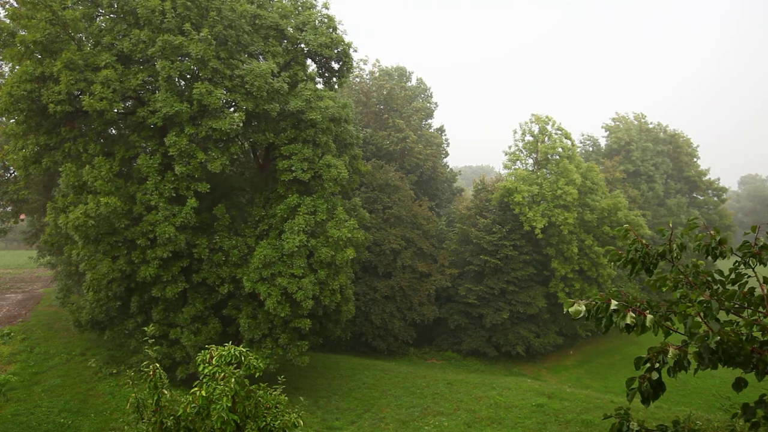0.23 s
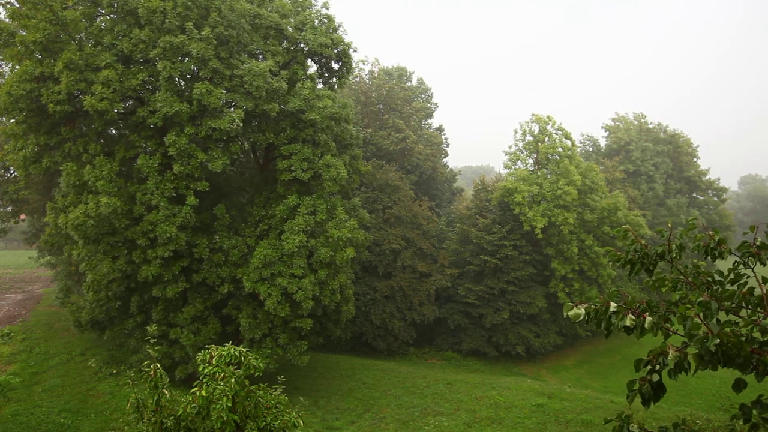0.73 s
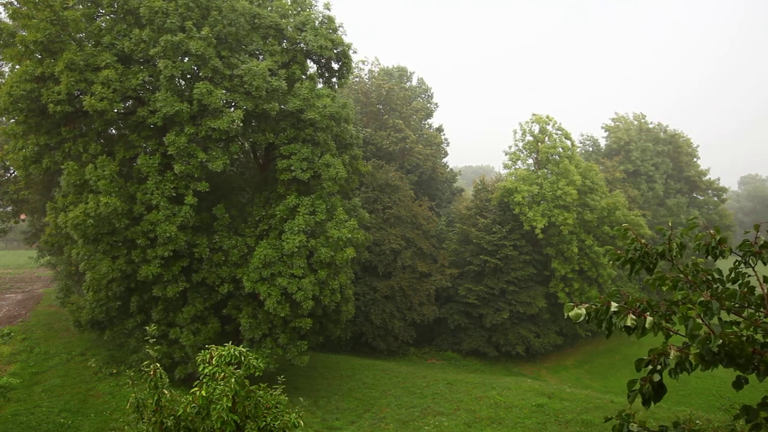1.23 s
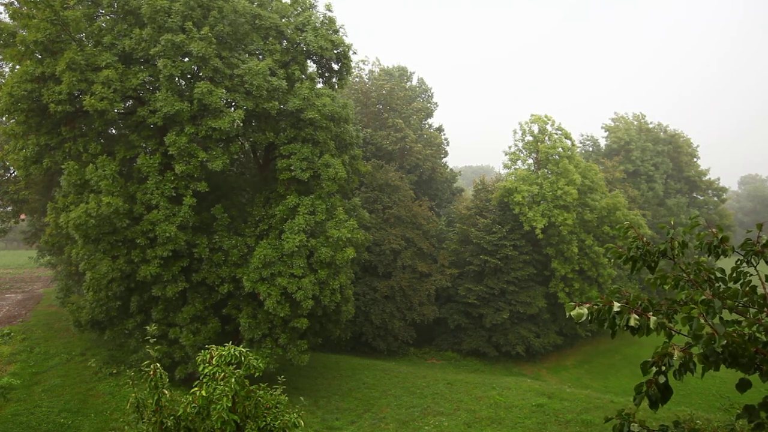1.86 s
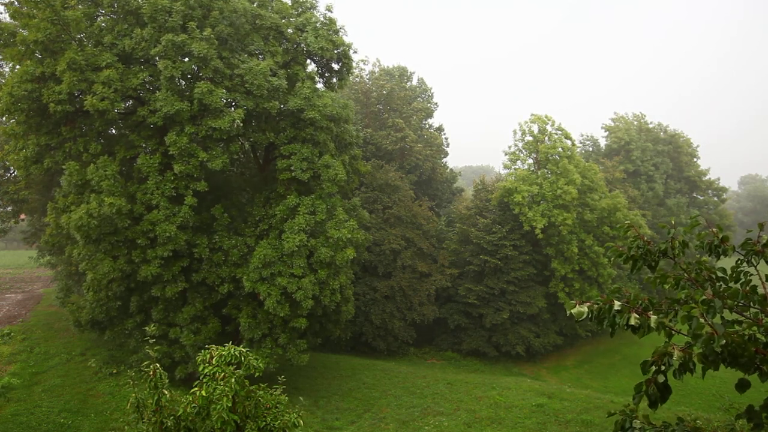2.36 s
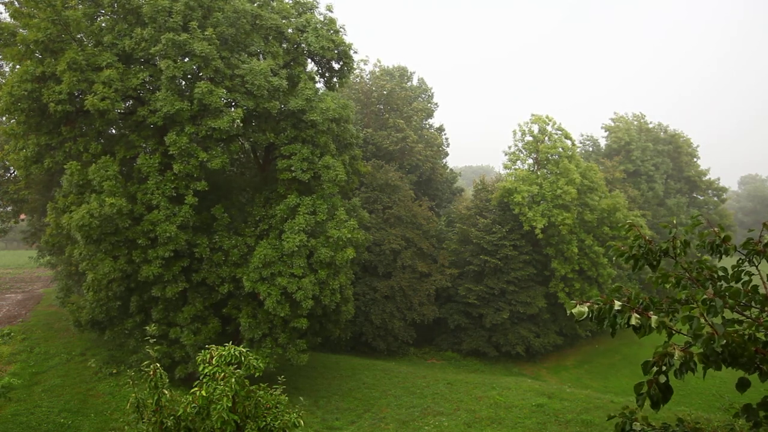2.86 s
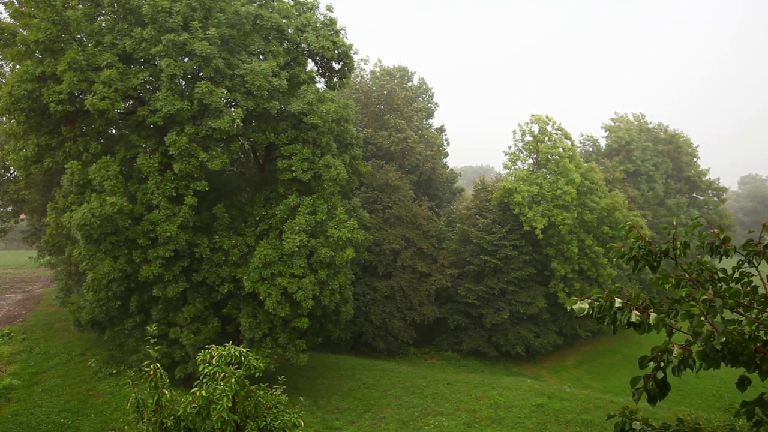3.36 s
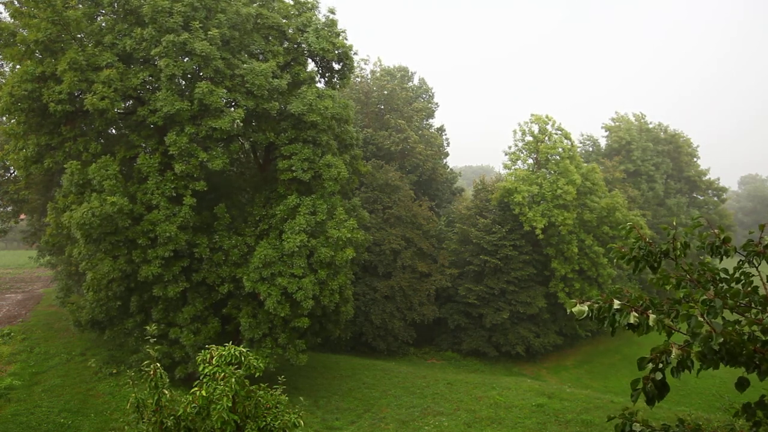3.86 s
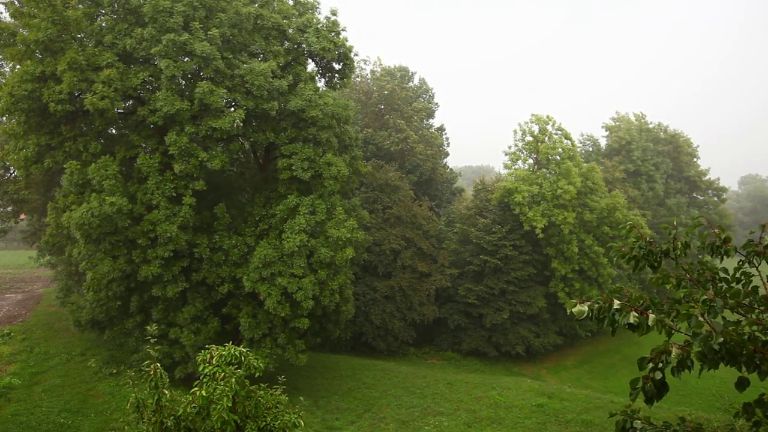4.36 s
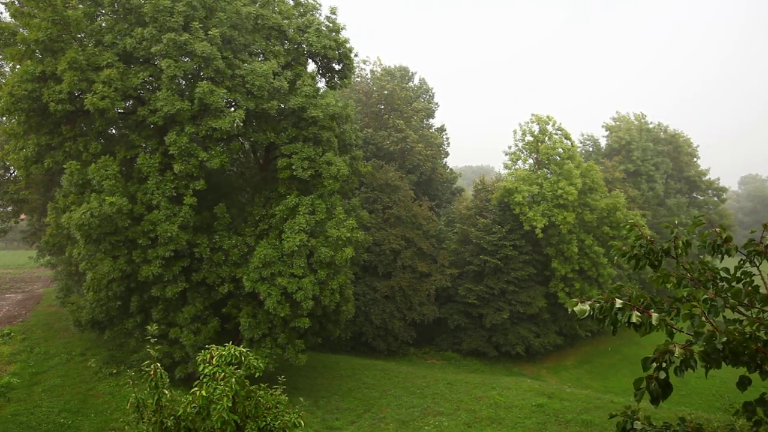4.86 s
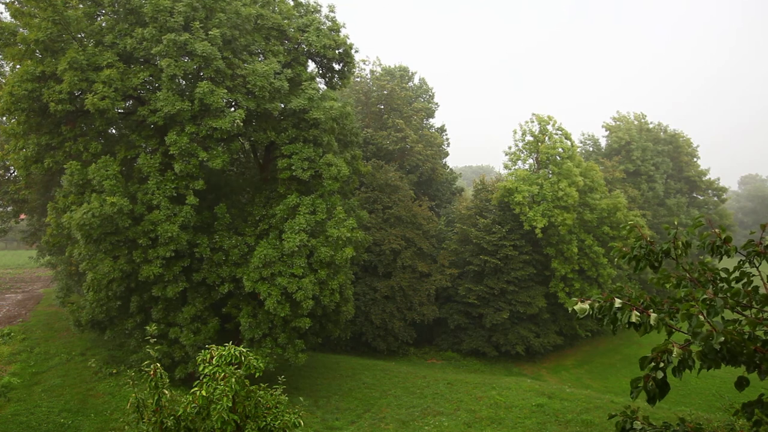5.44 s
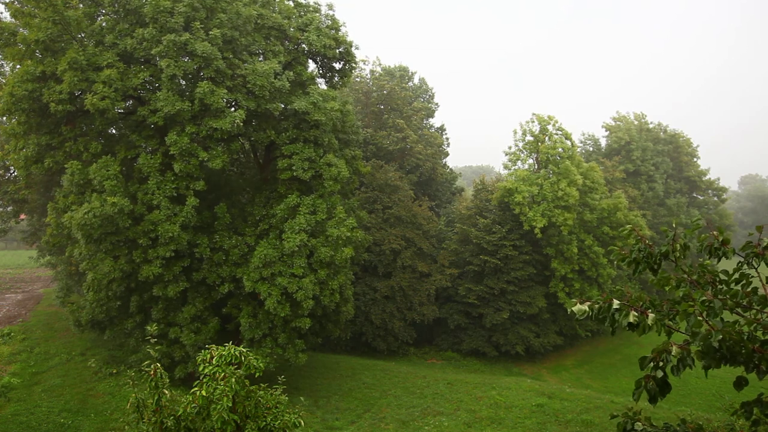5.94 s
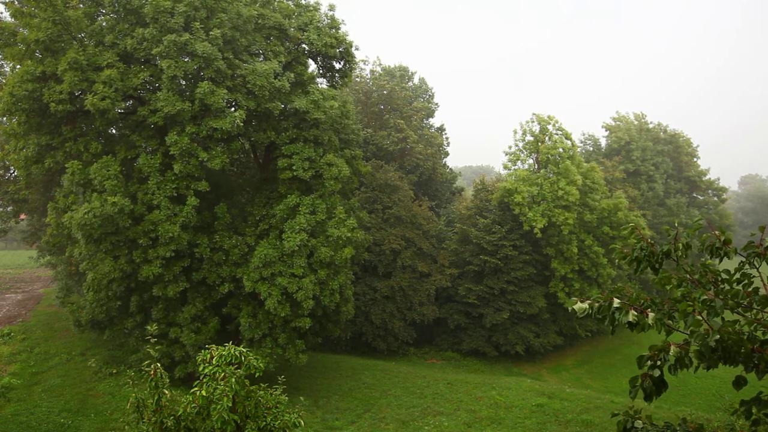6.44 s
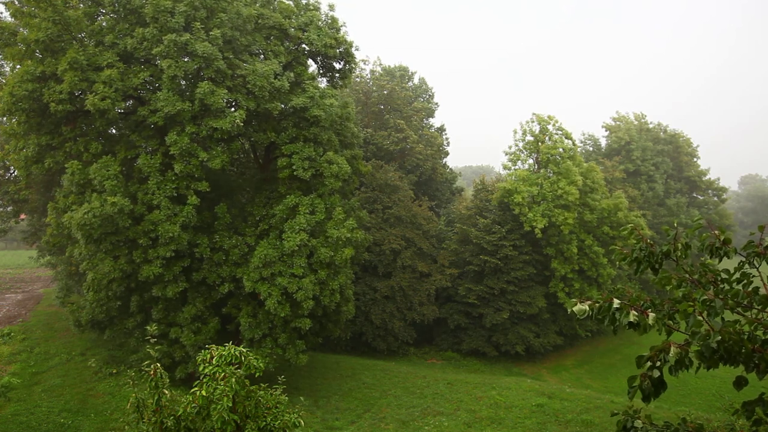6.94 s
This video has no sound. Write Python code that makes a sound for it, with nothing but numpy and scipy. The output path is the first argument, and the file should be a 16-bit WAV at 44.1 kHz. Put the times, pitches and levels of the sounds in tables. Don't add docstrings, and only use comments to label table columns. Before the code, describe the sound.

Heavy steady rain hisses over leafy trees and grass, with close drops snapping and splashing on leaves and soft wind thumps on the microphone.

```python
import sys
import numpy as np
from scipy import signal
from scipy.fft import rfft, irfft
from scipy.io import wavfile
from scipy.ndimage import uniform_filter1d

SR = 44100
rng = np.random.default_rng(int(sys.argv[2]) if len(sys.argv) > 2 else 0)


def field_ratio(decibels):
    return 10 ** (np.asarray(decibels, dtype=float) / 20)


def transcribe(u):
    v = np.clip(np.atleast_2d(u).T, -1, 1)
    q = np.round(v * 32767).astype(np.int16)
    wavfile.write(sys.argv[1], SR, q)


N = 317520


def evened(x):
    return x / np.sqrt(np.mean(x ** 2) + 1e-20)


def read(points, hz):
    f, value = np.transpose(points)
    return np.interp(np.log(hz + 1), np.log(f + 1), value)


def follow(rows):
    return np.interp(np.arange(N) / SR, *np.transpose(rows))


def colour(x, points):
    return irfft(rfft(x) * field_ratio(read(points, np.fft.rfftfreq(len(x), 1 / SR))), len(x))


def add(mix, s, sound):
    part = mix[..., round(s * SR):][..., :sound.shape[-1]]
    part += sound[..., :part.shape[-1]]


def ring(x, hz, width_hz):
    turn = np.exp(2j * np.pi * hz * np.arange(len(x)) / SR)
    r = np.exp(-np.pi * width_hz / SR)
    return 2 * (turn * signal.lfilter([1 - r], [1, -r], x / turn)).real


def twice(x, hz, width_hz):
    return evened(ring(ring(x, hz, width_hz), hz, width_hz))


def decay(count, t60):
    return field_ratio(-60 * np.arange(count) / SR / t60)


def peaked(x, db):
    return field_ratio(db) * x / abs(x).max()


# (t/s, level/dB)
SHELTER_ECHOES = [
    (.004, -10.5),
    (.0078, -11),
    (0.0151, -11),
    (.023, -18.5),
]


def echoed(x):
    out = x.copy()
    for s, db in SHELTER_ECHOES:
        add(out, s, field_ratio(db) * x)
    return out


def far_rain(patchy_db=0.55, flicker_db=0.35):
    frames, hz = N // 128 + 5, np.fft.rfftfreq(512, 1 / SR)
    a, b, patches = rng.standard_normal((frames, 257, 3)).T
    a, b, patches = a.T, b.T, patches.T
    a, b, patches = a.T, b.T, patches.T
    patches = uniform_filter1d(patches, size=10, axis=0)
    patches = evened(uniform_filter1d(patches, size=20, axis=1))
    flicker = evened(uniform_filter1d(rng.standard_normal(frames), size=16))
    treble = np.clip(hz / 4000, 0, 1)[:, None]
    z = (a + 1j * b) * field_ratio(treble * (patchy_db * patches + flicker_db * flicker))
    return evened(signal.istft(z, nperseg=512, noverlap=384)[1][:N])


def patter(per_s=200, spread_db=4.5, t60=0.034, low_hz=1100, high_hz=13000, count=30):
    falls = np.minimum(rng.exponential(1, N), 3)
    size = field_ratio(spread_db * falls) * (rng.random(N) < per_s / SR)
    leaf, out = rng.integers(0, count, N), np.zeros(N)
    for k, hz in enumerate(np.linspace(low_hz, high_hz, count)):
        burst = rng.standard_normal(2048) * decay(2048, t60)
        out += signal.oaconvolve(size * (leaf == k), evened(ring(burst, hz, 0.21 * hz)))[:N]
    return evened(out)


# (t/s, level/dB)
DOWNPOUR = [(0, -19.5), (.9, -18.5), (1.2, -18), (2.0, -20.5), (2.7, -20), (3.2, -21.5), (3.6, -19.5),
            (4.1, -20), (4.8, -18.5), (5.2, -20), (5.43, -18), (5.6, -20.5), (6.0, -19.5), (6.8, -20.5),
            (7.2, -20)]
# (f/Hz, level/dB per Hz)
RAIN_COLOUR = [(15, -47), (25, -27), (38, -9.5), (156, -5.5), (282, -2.5), (423, -5.5), (560, -5),
               (687, -2.5), (975, -1.5), (1910, -0.5), (3200, -2.5), (5460, -2), (9000, -4.5),
               (16000, -2.5)]


def downpour():
    rain = far_rain() + field_ratio(-15.0) * evened(echoed(patter()))
    return evened(colour(rain, RAIN_COLOUR)) * field_ratio(follow(DOWNPOUR) + 5.0)


def close_drop(db, leaf_hz, spray_hz, spray_db, t60, splash=0.52, blow=.15):
    count = 5000
    noise = rng.standard_normal((3, count))
    noise *= 1 + blow * np.exp(-np.arange(count) / SR / 0.00045)
    spray = field_ratio(spray_db)
    leaf = np.sqrt(1 - spray ** 2) * twice(noise[0], leaf_hz, 700)
    rings = leaf + spray * twice(noise[1], spray_hz, 1370)
    wide = twice(noise[2], 7500, 7700)
    return peaked(rings * decay(count, t60) + splash * wide * decay(count, 3.1 * t60), db - 3.0)


# (t/s, peak level/dB, leaf ring f/Hz, spray ring f/Hz)
KNOCKS = [(0.416, -4.5, 3720, 5920), (0.9276, 3.5, 3070, 4650), (2.8397, -4.5, 2090, 6400),
          (2.8804, -8.5, 2230, 4420), (3.4072, -9, 1920, 5750), (3.5557, -3, 3800, 4200),
          (4.6934, -6, 2560, 5500), (4.9371, -6, 2600, 4510), (5.021, -6, 3750, 5490),
          (5.291, -3, 1860, 5590), (5.3611, -5, 2630, 7350), (5.4405, -1, 2030, 5100),
          (5.9963, -7, 1830, 4330), (6.0543, -1, 2520, 4820), (6.8468, -3, 3450, 4630)]


def leaf_knocks(close, spray_db=-4.5, t60=0.023, strays=18):
    for s, db, leaf_hz, spray_hz in KNOCKS:
        add(close, s, close_drop(db, leaf_hz, spray_hz, spray_db, t60))
    for when, size, leaf, spray in rng.random((strays, 4)):
        db = -15 + 6 * (size - .5)
        leaf_hz = np.interp(leaf, (0, 1), (1600, 3800))
        spray_hz = np.interp(spray, (0, 1), (4300, 7200))
        add(close, when * N / SR, close_drop(db, leaf_hz, spray_hz, spray_db, t60))


# (t/s, peak level/dB, spray ring f/Hz)
BURSTS = [(0.7598, -2.5, 5570), (1.3096, -4, 5480), (1.5788, -6, 6490), (1.767, -0.5, 5140),
          (2.1056, -6, 4630), (2.815, -3, 8000), (2.9734, -1.5, 4930), (3.321, -5.5, 5500),
          (3.5957, -5, 5980), (4.5295, -6, 4340), (5.1028, -4.5, 4510), (5.234, -4.5, 7290),
          (5.9347, -7, 6910), (6.0864, -3.5, 5130), (6.123, -2.5, 5370), (6.352, -3, 4500),
          (6.403, -6, 5020), (6.7048, -6, 7860), (6.769, -6.5, 6020)]


def spray_bursts(close, leaf_hz=3360, spray_db=-.6, t60=0.034):
    for s, db, spray_hz in BURSTS:
        add(close, s, close_drop(db, leaf_hz, spray_hz, spray_db, t60))


# (t/s, peak level/dB, f/Hz, width [share of f])
PLINKS = [(0.9274, -8.5, 3100, .08), (5.362, -11, 2600, .1), (5.362, -12, 3250, .1),
          (.9275, -5.5, 4600, 0.079), (.928, -9, 7800, .12), (1.268, -11, 5500, .2),
          (1.772, -12, 5200, 0.14), (2.828, -15, 7200, .2), (2.841, -8, 4500, 1.3),
          (3.036, -5.5, 14500, .4), (3.324, -7, 6560, 0.69), (3.549, -12, 3320, .3), (3.557, -8, 4200, 1),
          (3.597, -9, 8000, .5), (4.301, -10.5, 2540, 0.21), (4.696, -9, 8500, 1.1),
          (4.698, -9, 2950, 0.26), (5.04, -14, 2520, .16), (5.036, -5, 7500, 0.7), (5.362, -15, 6500, 1.1),
          (5.443, -8.5, 3200, 1.1), (5.935, -4, 12500, .6), (6.25, -19, 2800, .16),
          (6.283, -8.5, 12000, .6), (6.703, -7, 10500, .7), (6.77, -12, 5700, .2), (4.903, -9.5, 5600, .5),
          (3.345, -12, 5500, .9)]


def plinks(close):
    count = 4000
    swell = 1 - np.exp(-np.arange(count) / SR / 0.00068)
    for s, db, hz, width in PLINKS:
        t60 = np.interp(width, (.08, .2), (0.017, 0.038))
        body = twice(rng.standard_normal(count), hz, width * hz)
        add(close, s, peaked(body * decay(count, t60) * swell, db))


# (t/s, peak level/dB)
TICKS = [(0.1096, -35), (0.2543, -37), (0.3651, -37), (0.426, -35), (0.7262, -37), (0.7592, -34),
         (0.9274, -26), (1.4556, -35), (3.036, -34), (3.5463, -31), (4.5845, -32), (4.8224, -29),
         (4.8544, -33), (4.9038, -35), (5.9359, -35), (6.535, -32), (6.9187, -36)]


def spray_ticks(close, hz=12300, faint_db=-37, strays=18):
    count = 1500
    faint = [(when * N / SR, faint_db) for when in rng.random(strays)]
    for s, db in TICKS + faint:
        body = twice(rng.standard_normal(count), 0.96 * hz, 6000) * decay(count, 0.03)
        add(close, s, peaked(body, db - 1.0 - read(MICROPHONE, hz)))


def close_rain():
    close = np.zeros(N)
    close[round(.92755 * SR)] = -field_ratio(11.5)
    leaf_knocks(close)
    spray_bursts(close)
    spray_ticks(close)
    plinks(close)
    return close


def thump(db, hz, direction, rebound):
    u = (np.arange(2000) - 1000) / SR * hz * 5.57
    return np.sign(direction) * field_ratio(db) * (1 - u ** 2 - rebound * u) / (1 + u ** 2 / 6.6) ** 3


# (t/s, peak level/dB, f/Hz, direction [sign], rebound [share])
EDDIES = [(0.287, -19.5, 155, 1, .2), (0.7358, -23, 111, 1, .3), (.7618, -22, 198, 1, .2),
          (0.7793, -18, 184, 1, .2), (2.5392, -25, 150, -1, .3), (2.548, -14, 146, -1, .05),
          (2.9423, -22, 107, -1, .1), (3.3578, -17, 190, -1, -.4), (3.8656, -20, 97, 1, .2),
          (3.9157, -16, 171, -1, .4), (3.9315, -17, 330, -1, 0.12), (3.9343, -3.5, 288, 1, 0.35),
          (3.9758, -13, 130, -1, .05), (4.339, -16, 111, -1, .05), (4.597, -21, 134, -1, 0.14)]


def eddies(air):
    for s, *push in EDDIES:
        add(air, s - 1000 / SR, thump(*push))


# (centre t/s, peak level/dB, half width t/s)
GUSTS = [(.1, -36, .1), (.26, -29.5, 0.044), (.5, -38, .07), (.66, -33, .02), (.79, -29.5, .07),
         (.9, -34, .03), (1.7, -41, .06), (2.55, -33, .03), (2.63, -32, .035), (2.94, -36, 0.077),
         (3.09, -35, .035), (3.21, -33, 0.038), (3.4, -26, 0.034), (3.75, -39, .03), (3.83, -31.5, .02),
         (3.945, -27, .04), (4.07, -29.5, 0.037), (4.22, -37, .06), (4.335, -28, 0.029), (4.59, -29, .06),
         (4.85, -40, .17), (6.08, -50, .08), (7.12, -42, .05)]


def gusts(breeze_db=-55):
    t = np.arange(0, N + 64, 64) / SR
    swells = sum(field_ratio(db) ** 2 * np.exp(-((t - s) / half_s) ** 2) for s, db, half_s in GUSTS)
    return field_ratio(breeze_db) ** 2 + np.interp(np.arange(N) / SR, t, swells)


# (f/Hz, level/dB per Hz)
WIND_COLOUR = [(15, -36), (35, -5.5), (80, -2), (140, -5.5), (250, -16), (450, -20.5), (900, -53)]


def wind(lumpy_db=3.0):
    lumps = evened(uniform_filter1d(rng.standard_normal(N), size=700))
    rumble = colour(rng.standard_normal(N), WIND_COLOUR) * field_ratio(lumpy_db * lumps)
    return evened(rumble) * np.sqrt(gusts())


def scene():
    rain = downpour() + echoed(close_rain())
    air = wind()
    eddies(air)
    return np.tile(rain + air, (2, 1))


# (f/Hz, level/dB)
MICROPHONE = [(10, -20), (30, -4.5), (50, -0.5), (6500, -1), (7500, -1), (8300, -4.5), (9200, -9.5),
              (10500, -16.5), (12500, -24.5), (15700, -33), (22050, -45)]


def microphone(x):
    return colour(x, MICROPHONE)


def duck(x, knee_db=-13.0, recover_s=0.27, attack_s=0.0013, lag_s=0.0018):
    sharp = signal.sosfilt(signal.butter(1, 500, "high", fs=SR, output="sos"), x)
    peak_db = 10 * np.log10(abs(uniform_filter1d(sharp ** 2, size=200)) * 2 + 1e-12)
    over = np.log(np.maximum(peak_db - knee_db, 1e-3))
    t = np.arange(N) / SR
    held_db = np.exp(np.maximum.accumulate(over + t / recover_s) - t / recover_s)
    r = np.exp(-1 / (attack_s * SR))
    cut_db = signal.lfilter([1 - r], [1, -r], held_db)
    return x / field_ratio(np.interp(t - lag_s, t, cut_db))


# (t/s, bands [count])
NOISE_SWAPS = [(0.068, 2), (0.208, 2), (0.695, 1), (1.345, 2), (1.531, 1), (1.554, 3), (1.624, 2),
               (1.717, 2), (2.019, 3), (3.157, 2), (3.342, 1), (3.389, 3), (3.458, 1), (3.807, 2),
               (3.923, 2), (3.969, 1), (6.036, 3), (6.198, 1), (6.872, 1), (7.104, 2), (7.15, 3),
               (7.174, 3)]


def swap_noise(x, low_hz=4200, high_hz=15750, width_hz=1150):
    frame, grid = 1024, 962
    x, n, k = np.pad(x, (0, 2 * frame)), np.arange(2 * frame), np.arange(frame) + .5
    window = signal.windows.kaiser_bessel_derived(2 * frame, 4 * np.pi)
    lapped_cosines = np.cos(np.pi / frame * np.outer(k, n + .5 + frame / 2))
    basis = np.sqrt(2 / frame) * window * lapped_cosines
    out, hz = np.tile(x, (2, 1)), k * SR / 2 / frame
    places = np.arange(low_hz, high_hz - width_hz, width_hz)
    deck = iter(np.concatenate([rng.permutation(places) for _ in NOISE_SWAPS]))
    for s, bands in NOISE_SWAPS:
        start = grid + frame * (round((s * SR - grid) / frame) - 1)
        lows = [next(deck) for _ in range(bands)]
        rows = np.any([(hz > f) & (hz < f + width_hz) for f in lows], axis=0)
        band = basis @ x[start:start + 2 * frame]
        strength = np.sqrt(abs(uniform_filter1d(band ** 2, size=32)))
        noise = rng.standard_normal((2, frame))
        add(out, start / SR, (strength * noise - band)[:, rows] @ basis[rows])
    return out[:, :N]


def roll_off(x):
    return signal.sosfilt(signal.butter(12, 15770, fs=SR, output="sos"), x)


def record(dry):
    mono = np.clip(duck(microphone(dry[0])), -1, 1)
    mix = swap_noise(mono)
    return roll_off(mix)


dry = scene()
out = record(dry)
transcribe(out)
```